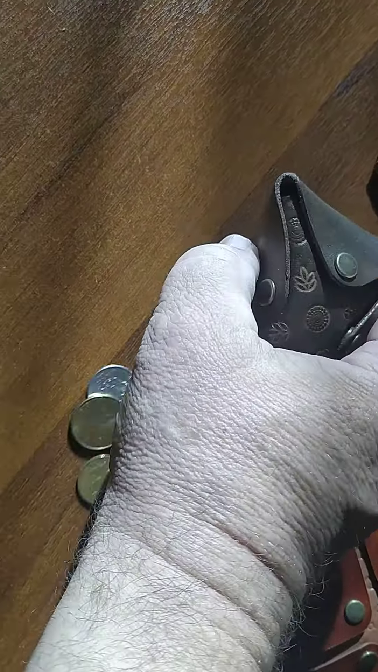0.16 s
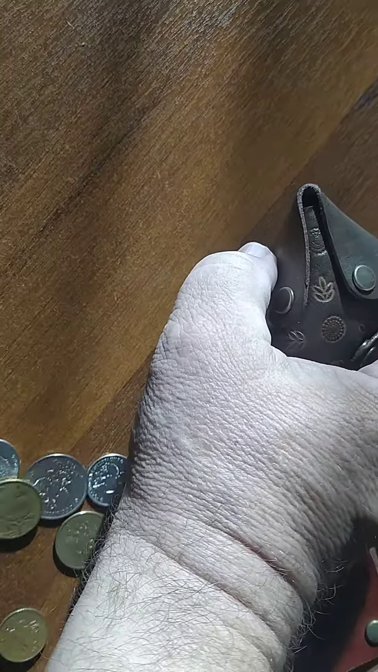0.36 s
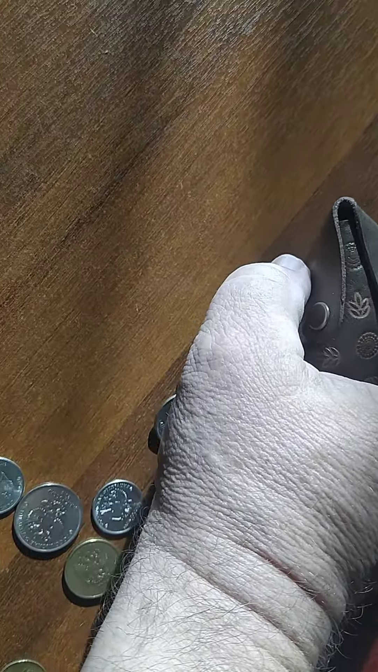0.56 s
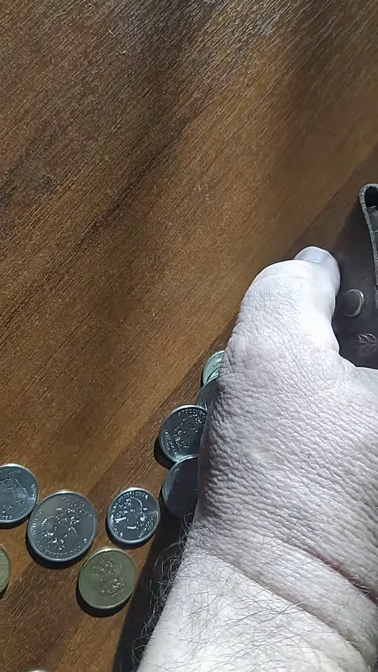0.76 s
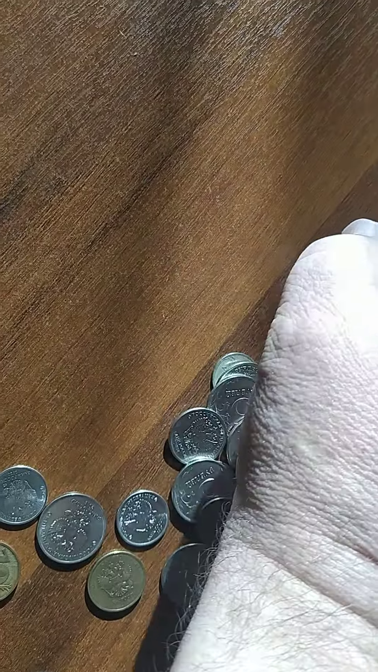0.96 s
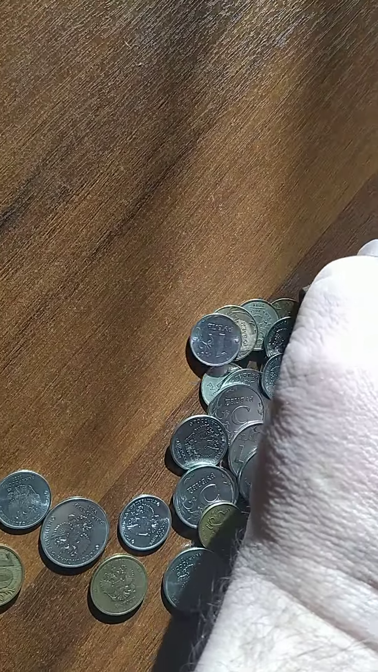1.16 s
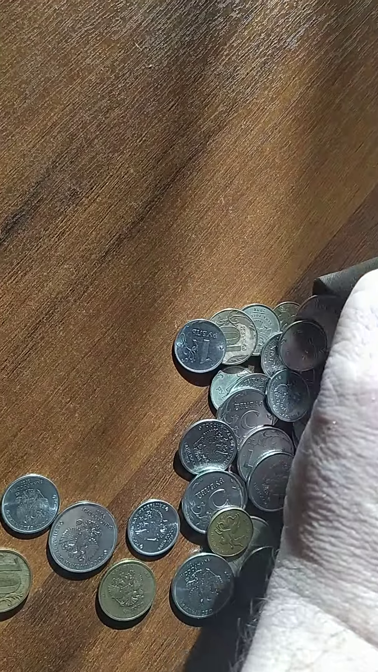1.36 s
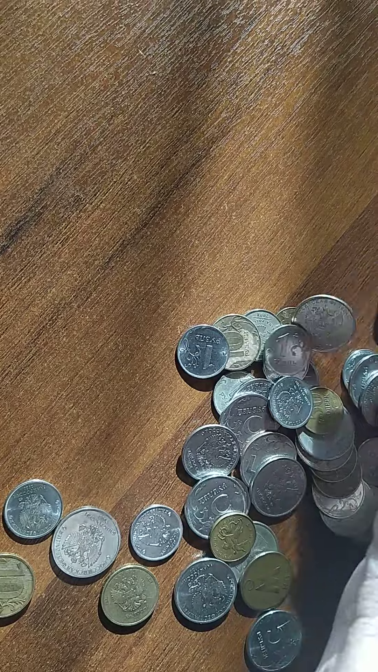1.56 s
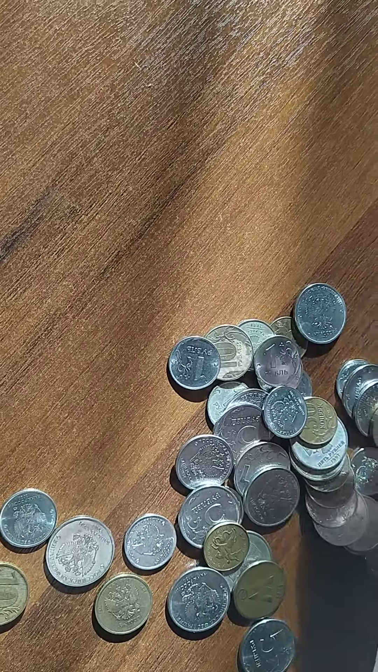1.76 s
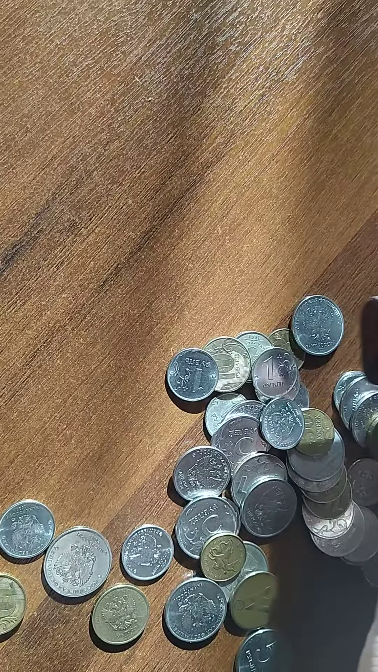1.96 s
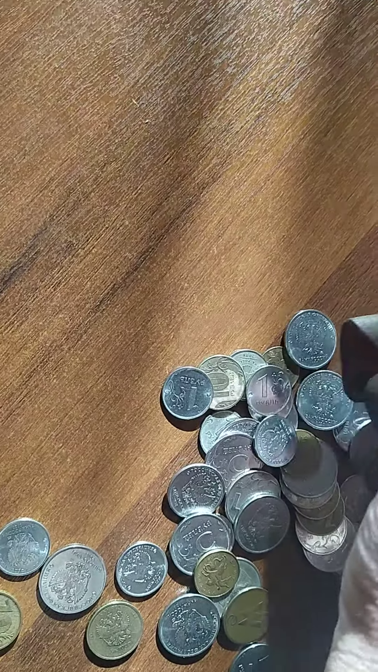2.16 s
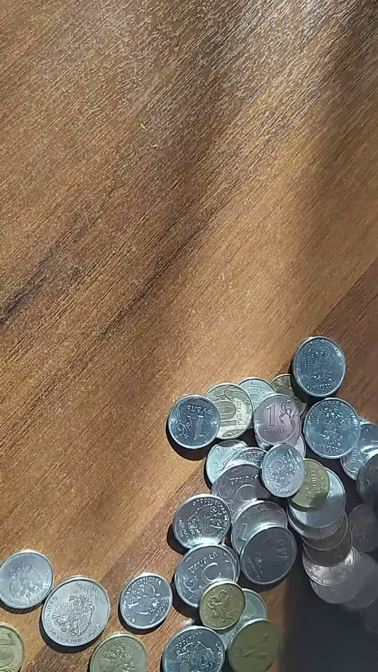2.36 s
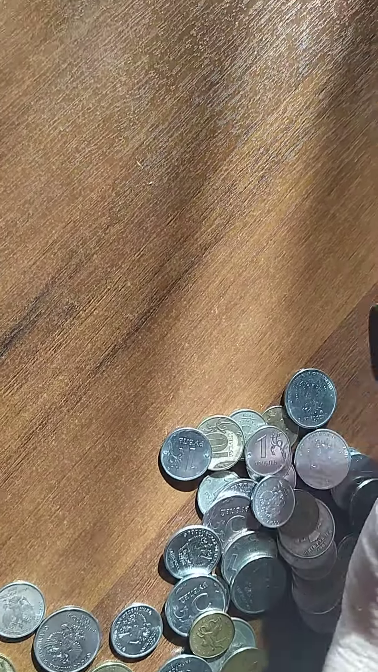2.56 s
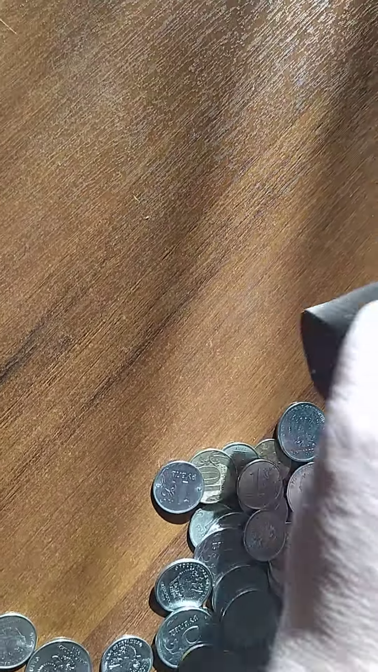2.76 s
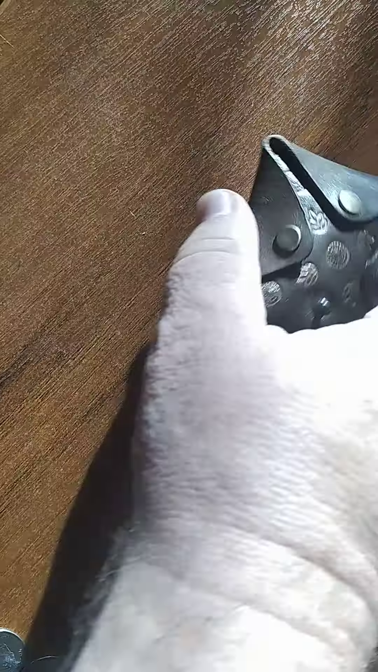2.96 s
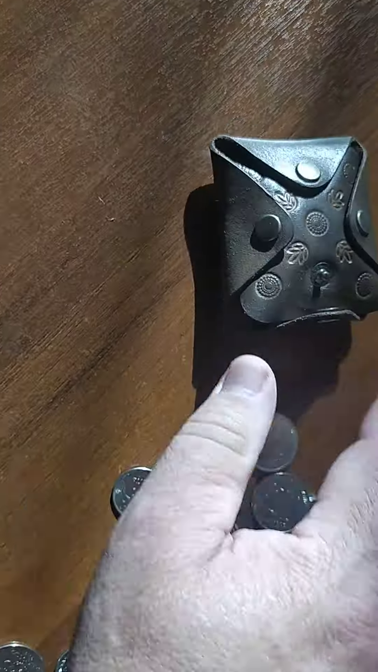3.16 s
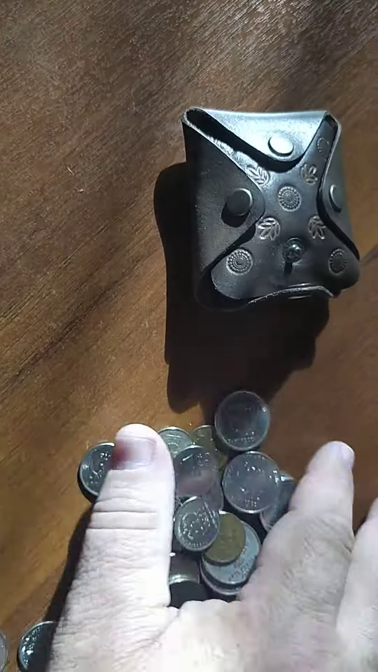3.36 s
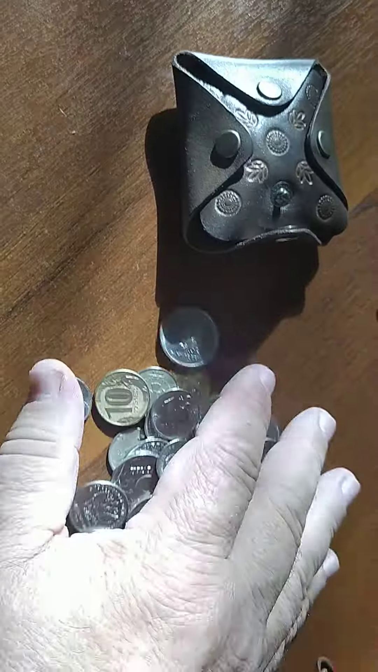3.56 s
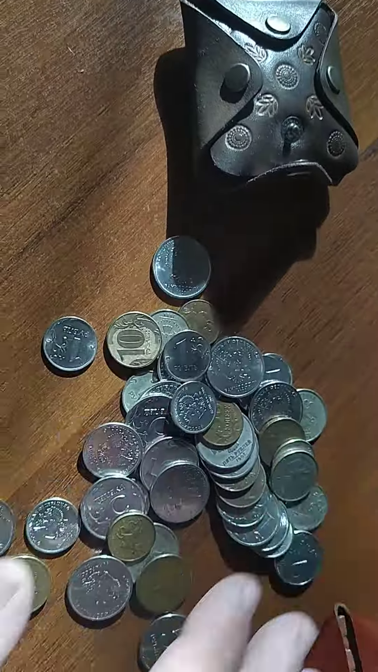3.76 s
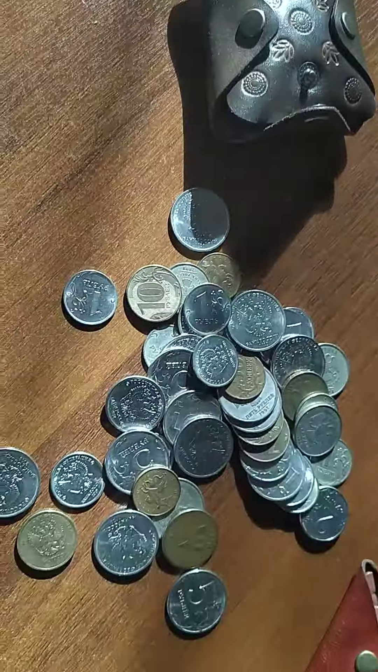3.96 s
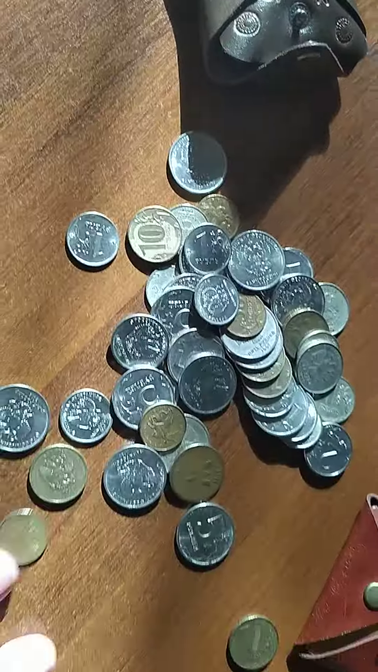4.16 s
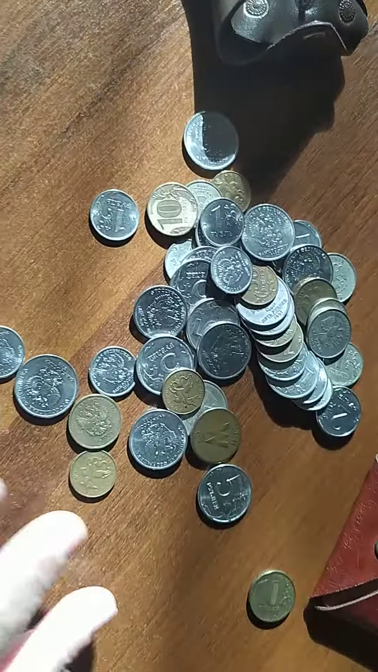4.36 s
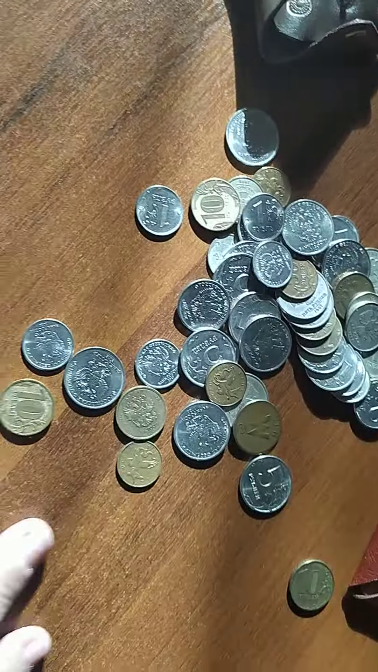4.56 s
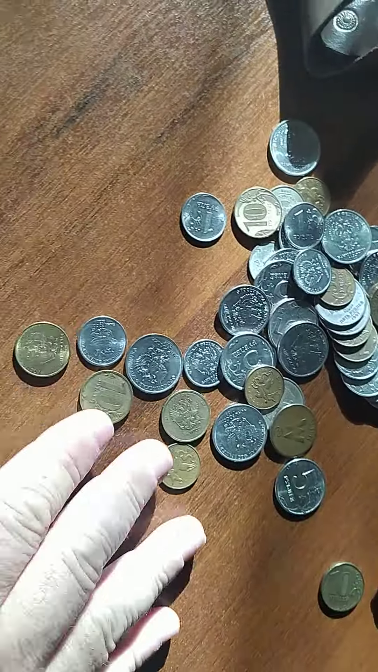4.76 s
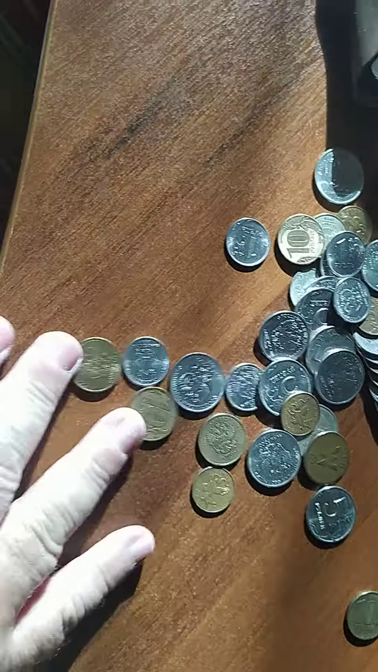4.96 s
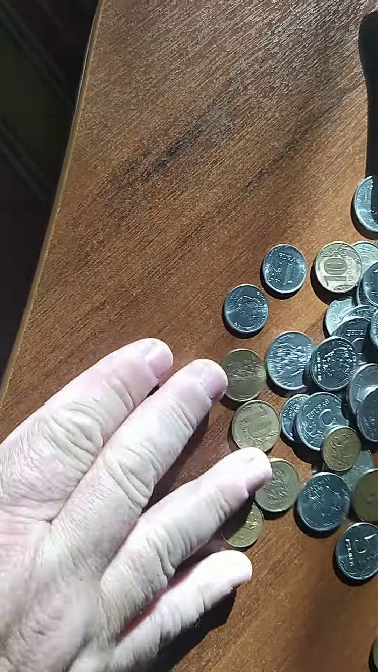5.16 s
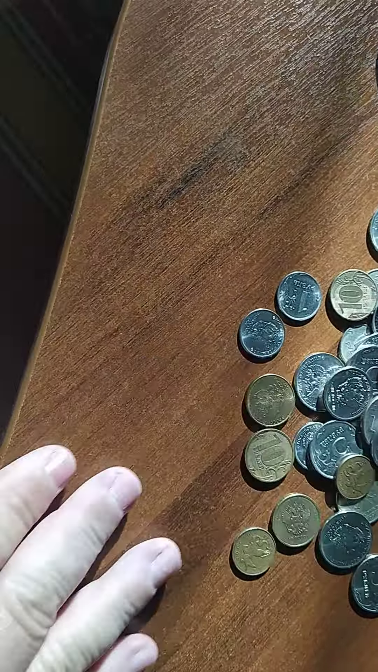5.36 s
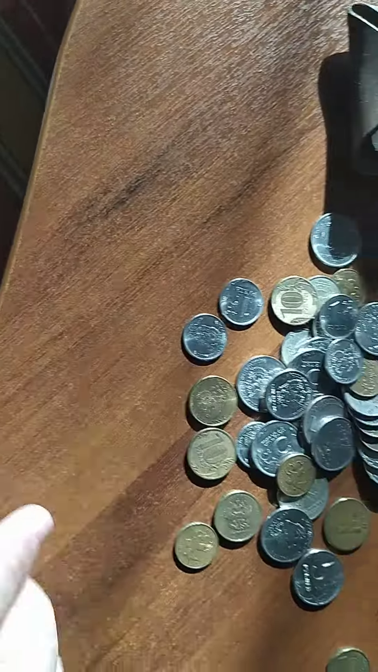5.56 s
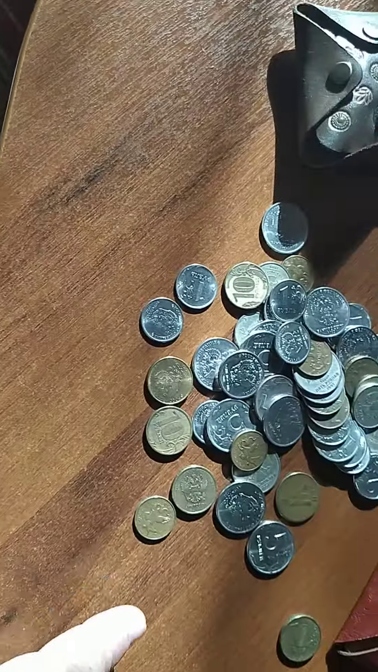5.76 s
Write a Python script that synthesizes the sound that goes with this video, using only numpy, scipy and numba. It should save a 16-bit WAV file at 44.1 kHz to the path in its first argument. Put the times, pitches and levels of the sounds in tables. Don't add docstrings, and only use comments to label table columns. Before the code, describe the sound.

A heap of metal coins pours jingling onto a wooden tabletop, a few last bursts follow, then sparse clinks as fingers spread them.

```python
import sys
import numpy as np
from scipy import signal
from scipy.fft import rfft, irfft
from scipy.io import wavfile
from scipy.ndimage import uniform_filter1d
from numba import njit

SR = 44100
rng = np.random.default_rng(int(sys.argv[2]) if len(sys.argv) > 2 else 0)


def master_out(mix):
    frames = np.transpose(np.atleast_2d(mix))
    ceiling = np.clip(frames, -1, 1)
    pcm = np.round(ceiling * 32767).astype(np.int16)
    wavfile.write(sys.argv[1], SR, pcm)


def linear_from_db(decibels):
    return 10 ** (np.asarray(decibels, float) / 20)


N = 255780

COINS_PAN_DB, TOP_PAN_DB, BODY_PAN_DB = -3, -1.7, 5

# (frequency [Hz], level [dB per Hz])
METAL_SPECTRUM = [(1470, -28.5), (2500, -7), (3320, -13), (4210, -6), (4970, -10.5), (8770, 1.5),
                  (9950, 3.5), (10600, 3), (11800, -13), (12800, -4), (15100, -10), (16100, -29.5),
                  (16500, -50.5)]
TOP_SPECTRUM = [(380, -37), (650, -22.5), (758, -5), (1040, 1), (1380, -2), (1750, 1), (2600, -0.5),
                (3310, -3.5), (4210, -2), (4960, -3.5), (6500, -8.5), (8450, -34.5), (14300, -120)]
BODY_SPECTRUM = [(53, -50), (90, -24), (135, -15), (237, -8.5), (272, -3.5), (326, -10), (408, 0),
                 (532, -4.5), (700, -8.5), (910, -38.5), (1540, -120)]
# (time [s], peak level [dB], strongest ring [Hz], table thump minus coin [dB])
POUR_KNOCKS = [(0.0034, -20, 10100, -23), (0.1476, -8, 10800, -7), (0.1644, -13, 8730, -1.5),
               (0.2159, -4.5, 8530, -11.5), (0.237, -9, 9000, -15), (0.2974, -10.5, 8790, -3),
               (0.3391, -10.5, 8310, -7), (0.3564, -6.5, 8350, -16), (0.3834, -8, 8870, -18),
               (0.4044, -10.5, 9070, -22), (0.4554, -2.5, 9750, -17), (0.4754, -13.5, 10340, -27),
               (0.5786, -20.5, 9860, -13), (0.603, -16.5, 9900, -7), (0.7214, -16, 8575, -6),
               (0.7337, -11.5, 9840, -9), (0.7601, -13.5, 10340, -13), (0.7801, -8.5, 9870, -12),
               (0.8026, -17.5, 8890, -8.5), (0.8495, -18.5, 10720, -13), (1.0076, -11, 9920, -17),
               (1.0134, -16.5, 10500, -21), (1.0586, -8, 10240, -18.5), (1.1293, -9, 9160, -15),
               (1.1662, -16, 10050, -13), (1.1863, -14, 10050, -13.5), (1.2425, -14.5, 10470, -18),
               (1.2804, -18, 9830, -11), (1.3463, -12, 8330, -14), (1.1134, -19, 8920, -8)]
SHAKE_KNOCKS = [(1.5165, -21, 9700, -21.5), (1.5344, -19, 10600, -18), (1.576, -31, 9900, -21),
                (1.627, -23, 9940, -9.5), (1.6742, -4, 8850, -8), (1.7143, -11.5, 10200, -10.5),
                (1.74, -12, 10200, -9), (1.8045, -18.5, 8560, -7.5), (1.8255, -21, 8300, -9.5),
                (1.8811, -31.5, 8900, -24), (1.9324, -47, 9600, -13), (1.9604, -48, 7930, -18),
                (1.9989, -53.5, 9200, -11), (2.0515, -10, 10000, -6.5), (2.081, -9.5, 8800, -15),
                (2.0983, -7.5, 8700, -18), (2.1114, -16.5, 8800, -18.5), (2.12, -10.5, 8300, -34),
                (2.1956, -19, 7900, -10.5), (2.226, -25.5, 8800, -10), (2.2478, -25, 8400, -10),
                (2.273, -35.5, 8850, -10), (2.3083, -39.5, 9150, -8), (2.3271, -53, 8700, -17),
                (2.353, -43, 8950, -11), (2.3654, -48, 8900, -16), (2.3835, -54, 9020, -19),
                (2.415, -12.5, 10100, -12), (2.441, -17.5, 6440, -13), (2.4578, -21.5, 9930, -5.5)]
PUSH_KNOCKS = [(3.0734, -44.5, 8300, -6.5), (3.0979, -55, 7680, -15), (3.4625, -28, 9820, -21.5),
               (3.4935, -27, 10300, -17), (3.5304, -21, 8490, -22), (3.5389, -11, 8040, -16),
               (3.6047, -16.5, 9880, -3.5), (3.6621, -21, 9660, -9), (3.687, -20.5, 7600, -16),
               (3.705, -34, 9530, -12), (3.7309, -18.5, 9640, -9.5), (4.136, -48, 10170, -19),
               (4.2882, -38, 10700, -27), (4.3136, -27.5, 8740, -13), (4.6289, -39.5, 9740, -8),
               (4.6932, -34.5, 10600, -4), (4.7102, -25.5, 10200, -11), (4.7501, -29.5, 9200, -5.5),
               (4.787, -41.5, 10500, -6), (4.809, -32, 9240, -15), (4.8329, -56, 8990, -15),
               (5.0509, -14, 8000, -22), (5.1582, -19.5, 10000, -17), (5.1831, -15, 9900, -16),
               (5.1916, -11.5, 9140, -18), (5.2215, -18.5, 9870, -6), (5.2964, -26.5, 10200, -23),
               (5.3138, -19.5, 6070, -7.5), (4.588, -41, 10600, -8), (5.028, -24, 9500, -28)]


def knocks():
    s, db, hz, thump_db = np.transpose(POUR_KNOCKS + SHAKE_KNOCKS + PUSH_KNOCKS)
    gains = sides(db, COINS_PAN_DB)

    skip_delay, skip_loss = rng.random((2, len(s)))
    landing = bursts(s, gains * linear_from_db(-6.5), decay_s=0.0015, alike=0.2)
    skip_s = s + 0.001 + 0.0037 * skip_delay
    skip = bursts(skip_s, gains * linear_from_db(-9 * skip_loss - 7), decay_s=0.0015, alike=0.1)
    settling = bursts(s, gains * linear_from_db(-18), decay_s=0.018, alike=0.1)
    crack = landing + skip + settling

    low_modes = jingle(s, gains * linear_from_db(-20), 3000, 11000, t60_s=0.025, count=6)
    high_modes = jingle(s, gains * linear_from_db(-20), 11300, 15600, t60_s=0.05, count=6)
    metal = colour(dull(crack) + low_modes + high_modes, METAL_SPECTRUM)
    ring = rings(s + 0.001, hz, 0.016, gains * linear_from_db(-11), apart=2)

    top = bursts(s, gains * linear_from_db(thump_db - 3), decay_s=0.0083, alike=0.13)
    body_gains = sides(db + thump_db - 15.5, BODY_PAN_DB)
    body = bursts(s + 0.0035, body_gains, decay_s=0.012, alike=0.97)
    return metal + ring + colour(top, TOP_SPECTRUM) + colour(body, BODY_SPECTRUM)


# (time [s], peak level [dB])
CLINKS = [(0.0054, -23.5), (0.0326, -29), (0.0811, -28), (0.0997, -28.5), (0.1108, -25.5),
          (0.1145, -24.5), (0.1367, -23.5), (0.1485, -14.5), (0.1623, -15.5), (0.1656, -16.5),
          (0.1775, -16.5), (0.1911, -23.5), (0.1954, -20.5), (0.2076, -14.5), (0.2138, -15),
          (0.2169, -7), (0.2376, -16.5), (0.2581, -13.5), (0.2648, -12.5), (0.277, -13.5),
          (0.2893, -10.5), (0.2955, -14.5), (0.2989, -13.5), (0.3151, -17), (0.33, -14), (0.3403, -7),
          (0.3582, -10), (0.365, -13.5), (0.3805, -11.5), (0.3865, -14.5), (0.3919, -14.5),
          (0.4008, -12), (0.4063, -12), (0.4354, -20), (0.4455, -18.5), (0.4574, -11.5),
          (0.4764, -13.5), (0.5288, -18.5), (0.542, -22.5), (0.5491, -23), (0.5605, -23),
          (0.5794, -19.5), (0.604, -20), (0.6164, -27.5), (0.662, -33), (0.671, -18.5),
          (0.7066, -22.5), (0.7227, -24.5), (0.7307, -17), (0.7348, -13.5), (0.7405, -16),
          (0.7608, -18), (0.7809, -13), (0.7839, -21.5), (0.8, -19), (0.8035, -18.5), (0.8281, -28.5),
          (0.8503, -26), (0.8551, -29), (0.8945, -35.5),
          (1.0067, -15), (1.0135, -16.5), (1.0595, -15.5), (1.0629, -14.5), (1.0831, -25),
                (1.088, -22.5), (1.113, -21), (1.1302, -13.5), (1.1336, -16), (1.1676, -17),
                (1.1906, -13.5), (1.2315, -18), (1.243, -17), (1.26, -20), (1.2814, -22.5), (1.2905, -18.5),
                (1.3484, -13), (1.3534, -17), (1.4365, -23.5), (1.5178, -21), (1.524, -26), (1.5356, -21),
                (1.558, -25), (1.5795, -31), (1.6147, -32.5), (1.6498, -22.5), (1.6594, -25.5),
                (1.6759, -8), (1.6776, -14), (1.7135, -16.5), (1.718, -19), (1.7405, -13.5),
                (1.7491, -15.5), (1.7808, -20), (1.805, -22), (1.825, -28.5), (1.8294, -23),
                (1.8486, -25.5), (1.882, -32.5), (1.896, -38), (1.9132, -36), (1.9269, -37.5),
                (1.9328, -42), (1.9616, -48), (2.0004, -58.5), (2.0515, -9), (2.0563, -17), (2.077, -13),
                (2.0824, -13.5), (2.098, -10.5), (2.1014, -11), (2.1133, -10.5), (2.1224, -15),
                (2.196, -22), (2.208, -25.5), (2.2163, -27.5), (2.2268, -28), (2.2465, -24), (2.275, -34.5),
                (2.2844, -50),
          (2.3108, -37), (2.328, -49), (2.3528, -36), (2.3668, -48), (2.3845, -46), (2.389, -52),
               (2.4163, -21), (2.4204, -34), (2.4395, -19), (2.4613, -25), (2.4704, -25), (2.6161, -62.5),
               (3.024, -50), (3.0742, -49.5), (3.0988, -52), (3.1401, -52), (3.463, -30), (3.4943, -19.5),
               (3.5396, -20), (3.5471, -12), (3.6058, -13), (3.654, -22), (3.6648, -19), (3.688, -33),
               (3.7076, -22.5), (3.718, -28), (3.7313, -17.5), (3.7343, -36), (4.1372, -55), (4.2882, -41),
               (4.296, -32.5), (4.315, -25.5), (4.3173, -31), (4.5887, -39), (4.5927, -53), (4.6295, -39),
               (4.6351, -48), (4.694, -28), (4.712, -35), (4.7512, -34), (4.7881, -39), (4.809, -31.5),
               (4.834, -42), (5.027, -38), (5.052, -19.5), (5.059, -33), (5.0627, -17), (5.0672, -29),
               (5.1258, -38), (5.1471, -26), (5.1592, -31), (5.1645, -37), (5.1696, -44), (5.186, -11),
               (5.193, -15), (5.2235, -21), (5.2271, -20), (5.2735, -26.5), (5.3157, -40), (5.3314, -39)]


def clinks():
    s, db = np.transpose(CLINKS)
    gains = sides(db, COINS_PAN_DB)
    crack = bursts(s, gains * linear_from_db(-3), decay_s=0.0014, alike=0.05)
    crack += rings(s, 9000 + 0 * s, 0.0017, gains * linear_from_db(-0.5), apart=2.5)
    modes = jingle(s, gains * linear_from_db(-7), 6000, 11000, t60_s=0.0059, count=4)
    wood = bursts(s, gains * linear_from_db(-21.5), decay_s=0.0042, alike=0.3)
    return colour(dull(crack) + modes, METAL_SPECTRUM) + colour(wood, TOP_SPECTRUM)


def rattle():
    metal_db, top_db, body_db = motion()
    when, strength, place = rng.random((3, 6000))
    s = when * N / SR
    gains = sides(-1.4 * np.log(strength), 6 * (place - 0.5))

    chatter = np.clip((metal_db + 65) / 25, 0, 1)
    contacts = unit(bursts(s, gains, decay_s=0.0009, alike=0.03))
    hiss = pair(0.05)
    ticks = dull(0.7 * chatter * contacts + (1 - 0.6 * chatter) * hiss)
    low_modes = unit(jingle(s[:4000], gains[:, :4000] ** 0.55, 3200, 11000, t60_s=0.065, count=1))
    high_modes = unit(jingle(s[:1500], gains[:, :1500] ** 0.8, 11300, 15400, t60_s=0.08, count=1))
    modes = 0.85 * low_modes + 0.75 * high_modes
    metal = unit(colour(ticks + chatter * modes, METAL_SPECTRUM))

    wood_modes = unit(jingle(s[:2500], gains[:, :2500], 700, 3500, t60_s=0.1, count=1))
    wood_contacts = unit(bursts(s, gains, decay_s=0.013, alike=0.033))
    top = unit(colour(wood_contacts + 0.31 * wood_modes, TOP_SPECTRUM))
    body = unit(colour(bursts(s, gains, decay_s=0.027, alike=0.9), BODY_SPECTRUM))

    metal = metal * sides(metal_db - 3.5, COINS_PAN_DB)
    top = top * sides(top_db - 3.5, TOP_PAN_DB)
    body = body * sides(body_db - 5, BODY_PAN_DB)
    return metal + top + body


# (time of full speed [s], hold [s],
# metal level [dB], table top minus metal [dB], table body minus top [dB])
SPILLS = [(0, .05, -33.5, -5, -14.5), (.152, 0.071, -24.5, 0, -13.5), (.462, 0.07, -21.5, -1, -14),
          (.58, 0.12, -31.5, -1.5, -11), (.736, 0.047, -25, -4.5, -12), (1.006, 0.23, -34, -1.5, -7),
          (1.52, .02, -34, 2.5, -10.5), (1.678, 0.0037, -32.5, 7.5, -21), (1.744, .005, -22.5, -4, -8.5),
          (1.93, 0.077, -72, 12, 0), (2.055, 0.0038, -32.5, 7.5, -13.5), (2.08, 0.059, -20, -7, -7),
          (2.417, 0.023, -34, 0.7, -15), (3.461, 0.0068, -43.5, 8.5, -25), (3.981, 0.047, -56.5, -23, 6.5),
          (4.175, 0.08, -61, 6, -19.5), (4.592, 0.081, -51.5, 6.5, -14.5), (4.698, 0.043, -42.5, 2, -14.5),
          (5.03, .02, -45.5, -1, -16), (5.055, 0.0059, -30, -3, -9.5), (5.09, 0.054, -45.5, 5.5, -24),
          (5.621, 0.0034, -55.5, 0.5, -0.5), (5.699, 0.074, -61, 1, -2)]
SLIDES = [(.135, 0.0039, -25.5, -8.5, -11), (.27, .15, -18, -3, -11.5), (.85, .14, -37, 3.5, -12),
          (1.18, 0.2, -25.5, -4.5, -8), (1.44, 0.01, -32.5, 4, -14), (1.6, 0.0073, -45.5, -3, -1.5),
          (1.666, .005, -29.5, -8.5, -7.5), (1.84, .04, -42, 4.5, -11), (2.3, 0.11, -66, 10, 4),
          (2.83, 0.062, -67, 1.5, -6), (3.0, .12, -71, 4, 1), (3.2, 0.018, -62, -1, 1),
          (3.53, 0.099, -25.5, -2.5, -11.5), (3.69, .02, -37.5, -1.5, -7.5), (4.17, .11, -55, -18, -2),
          (4.33, .005, -50.5, -1.3, -10), (4.5, 0.037, -66.5, 7, -3.5), (4.8, 0.013, -50.5, 2.5, -7.5),
          (4.87, 0.38, -54, -2, -11), (5.19, 0.0072, -27.5, -3, -13.5), (5.31, 0.011, -40, 7, -12.5),
          (5.47, 0.039, -59, -17, 0), (5.6, 0.0034, -62.5, -18.5, 0.5)]
REST_DB = [-75.5, -77.5, -77]


def motion():
    steeper_s = 0.073
    t = np.arange(0, N / SR, 0.001)
    power = linear_from_db(REST_DB)[:, None] ** 2 + 0 * t
    for rows, rise_db_s, settle_db_s in (SPILLS, 2596.5, 161), (SLIDES, 122.5, 172):
        s, hold_s, *steps_db = np.transpose(rows)
        early = np.maximum(s[:, None] - t, 0)
        late = np.maximum(t - (s + hold_s)[:, None], 0)
        loss_db = rise_db_s * early * (1 + (early / steeper_s) ** 2)
        loss_db += settle_db_s * late * (1 + late / (2 * steeper_s))
        levels_db = np.cumsum(steps_db, axis=0)
        power = power + linear_from_db(levels_db) ** 2 @ linear_from_db(-loss_db) ** 2
    return [np.interp(np.arange(N) / SR, t, 10 * np.log10(p)) for p in power]


# (time [s], peak level [dB], pitch [Hz])
POPS = [(0.968, -35, 445), (1.167, -21, 1120), (1.269, -21, 1310), (1.295, -12, 1200), (1.31, -14, 1140),
        (2.805, -47.5, 1450), (2.983, -51.5, 1570), (3.0232, -27, 1173), (3.037, -40, 1050),
        (3.067, -38, 1660), (3.07, -44, 1090), (3.075, -37, 1350), (3.088, -41, 1405), (3.14, -39.5, 1570),
        (3.154, -48, 1500), (3.165, -47, 1290), (4.319, -40, 1114), (5.617, -42.5, 1800), (5.629, -57, 471)]


def purse():
    s, db, hz = np.transpose(POPS)
    gains = sides(db, -1.5)
    pops = rings(s, hz, 10.5 / hz, gains * linear_from_db(13), apart=0.3, swell_s=0.0024)
    slap = bursts(s + 0.0011, gains * linear_from_db(-25.5), decay_s=0.0052, alike=0.36)
    return pops + colour(slap, TOP_SPECTRUM)


# (time [s], peak level [dB], pitch [Hz], ring t60 [s])
THUDS = [
    (3.971, -51.5, 107, 0.093),
    (4.597, -47, 70, 0.089),
    (5.031, -44.5, 71, 0.18),
    (5.688, -39, 263, 0.079),
    (5.706, -41.5, 114.6, 0.23),
    (5.71, -36.5, 178, 0.106),
    (5.735, -45, 188.3, 0.092),
    (5.748, -50, 258, 0.12),
]
# (time [s], lower line [Hz], level [dB])
SQUEAK = [
    (4.37, 5900, -95),
    (4.39, 6100, -78),
    (4.44, 6600, -76),
    (4.475, 7200, -76),
    (4.5, 7200, -80),
    (4.51, 6900, -100),
]


def fingers():
    s, db, hz, t60_s = np.transpose(THUDS)
    thuds = rings(s, hz, t60_s, sides(db, 4.9), apart=0.74)
    thuds = signal.lfilter([0.1], [1, -0.9], thuds)

    s, hz, db = np.transpose(SQUEAK)
    t = np.arange(N) / SR
    phase = 2 * np.pi * np.cumsum(np.interp(t, s, hz)) / SR
    lines = np.sin(phase) + 1.1 * np.sin(1.53 * phase)
    return thuds + linear_from_db(np.interp(t, s, db, -200, -200)) * lines


# (frequency [Hz], level [dB per Hz])
QUIET_SPECTRUM = [(8.8, -21.5), (15, 8.5), (75, -15.5), (123, -18.5), (164, -15.5), (286, -9.5),
                  (417, -28.5), (483, -25), (592, -19.5), (4840, -40.5), (10300, -27), (12000, -37),
                  (13400, -61.5), (16000, -54.5)]


def room_tone():
    quiet_db, hum_db, hum_hz = -61.5, -69.5, 120
    t = np.arange(N) / SR
    rumble = signal.lfilter([0.05], [1, -0.95], 3 * pair(0.29))
    air = unit(colour(pair(0) + rumble, QUIET_SPECTRUM)) * linear_from_db(quiet_db)
    waver = unit(uniform_filter1d(rng.standard_normal(N), 3000))
    hum = linear_from_db(hum_db + 3 + 0.8 * waver) * np.sin(2 * np.pi * hum_hz * t + 0.2 * waver)
    return air + hum


def jingle(s, gains, low_hz, high_hz, t60_s, count):
    chance = rng.random((len(s), count, 3))
    hz = low_hz * (high_hz / low_hz) ** chance[..., 0]
    mode_gains = gains[..., None] * linear_from_db(-10 * chance[..., 1])
    mode_t60_s = t60_s * (0.3 + chance[..., 2])
    return rings(np.repeat(s, count), hz.ravel(), mode_t60_s.ravel(), mode_gains.reshape(2, -1), apart=2)


def rings(s, hz, t60_s, gains, apart, swell_s=1e-6):
    out = np.zeros((2, N))
    turn = np.exp(1j * apart * rng.standard_normal(len(s)))
    soft = np.exp(-1 / (swell_s * SR))
    add_rings(out, (s * SR).astype(int), 1.0 * hz, t60_s + 0 * s, np.ascontiguousarray(gains), turn, soft)
    return out


@njit
def add_rings(out, at, hz, t60_s, gains, turn, soft):
    for e in range(len(at)):
        step = np.exp(2j * np.pi * hz[e] / SR - np.log(1000) / (t60_s[e] * SR))
        z, lag = 1 + 0j, soft
        for i in range(at[e], min(at[e] + int(t60_s[e] * SR), out.shape[1])):
            out[0, i] += gains[0, e] * (1 - lag) * z.imag
            out[1, i] += gains[1, e] * (1 - lag) * (z * turn[e]).imag
            z, lag = z * step, lag * soft


def bursts(s, gains, decay_s, alike):
    power = np.zeros((2, N))
    at = (s * SR).astype(int).clip(0, N - 1)
    np.add.at(power, (slice(None), at), gains ** 2)
    power = signal.lfilter([0.045], [1, -0.955], power)
    power = signal.lfilter([1], [1, -np.exp(-2 / (decay_s * SR))], power)
    return np.sqrt(power) * pair(alike)


def pair(alike):
    mid, side = rng.standard_normal((2, N))
    alike = np.clip(alike, 0, 1)
    return np.sqrt((1 + alike) / 2) * mid + np.sqrt((1 - alike) / 2) * side * np.array([[1], [-1]])


def sides(db, pan_db):
    return linear_from_db(db + np.array([[0.5], [-0.5]]) * pan_db)


def dull(x):
    return signal.sosfilt(signal.butter(2, 12500, fs=SR, output="sos"), x)


def colour(x, spectrum):
    size = 4096
    hz, db = np.transpose(spectrum)
    bins_hz = np.arange(size // 2 + 1) * SR / size
    log_gain = np.interp(np.log(bins_hz + 1), np.log(hz), db) * np.log(10) / 20
    cepstrum = irfft(log_gain)
    cepstrum[1:size // 2] *= 2
    cepstrum[size // 2 + 1:] = 0
    response = irfft(np.exp(rfft(cepstrum)))
    response /= np.sqrt(np.sum(response ** 2))
    return signal.oaconvolve(x, response[None], axes=1)[:, :N]


def unit(x):
    return x / np.sqrt(np.mean(x ** 2))


def scene():
    room_t60_s, room_db = 0.22, -14
    sources = knocks() + clinks() + rattle() + purse() + fingers()
    t = np.arange(SR // 2) / SR
    tail = rng.standard_normal((2, len(t))) * linear_from_db(-60 * t / room_t60_s) * (t > 0.003)
    tail = signal.lfilter([1], [1, -0.55], tail)
    tail /= np.sqrt(np.sum(tail ** 2) / 2)
    wet = signal.oaconvolve(sources, tail, axes=1)[:, :N]
    return sources + linear_from_db(room_db) * wet + room_tone()


def top_cut(x):
    return signal.sosfilt(signal.butter(12, 16640, fs=SR, output="sos"), x)


# (time [s], left level [dB], right level [dB])
JOLTS = [
    (0.219, -17.5, -25.5),
    (0.369, -30.5, -25.5),
    (0.74, -47, -39),
    (1.192, -30.5, -21),
    (1.349, -45, -42.5),
    (1.68, -20.5, -27.5),
    (1.748, -23, -31.5),
    (2.058, -36, -40),
    (2.093, -36, -40),
]


def record(dry):
    s, left_db, right_db = np.transpose(JOLTS)
    jolts = np.zeros((2, N))
    jolts[:, (s * SR).astype(int)] = linear_from_db([left_db, right_db])
    t = np.arange(SR // 2) / SR
    onset = 1 - np.exp(-(t / 0.0026) ** 2)
    swing = np.exp(-t / 0.067) * np.cos(2 * np.pi * 4.5 * t + 0.5)
    sag = -1.6 * onset * swing
    x = dry + signal.oaconvolve(jolts, sag[None], axes=1)[:, :N]
    x = np.tanh(0.8 * x) / 0.8
    x = signal.sosfilt(signal.ellip(6, 0.2, 60, 16200, fs=SR, output="sos"), x)
    return top_cut(x)


dry = scene()
out = record(dry)
master_out(out)
```